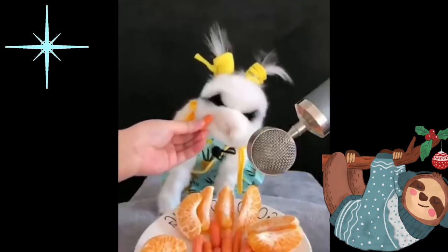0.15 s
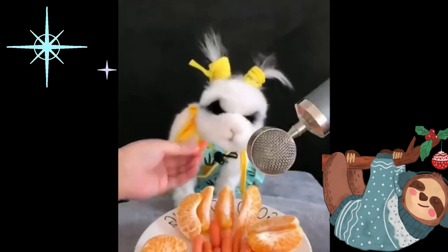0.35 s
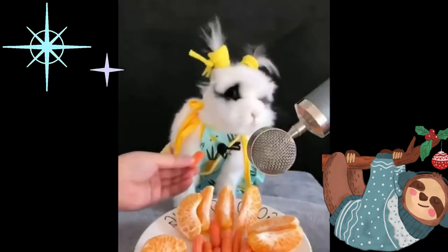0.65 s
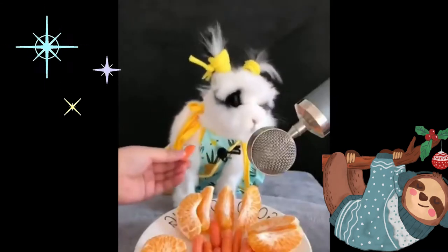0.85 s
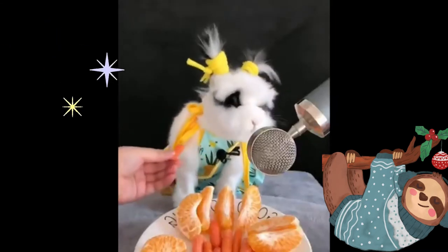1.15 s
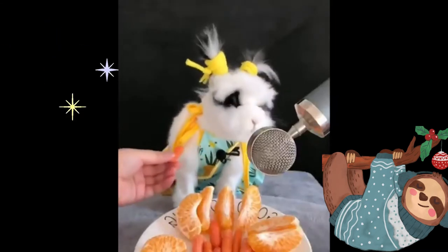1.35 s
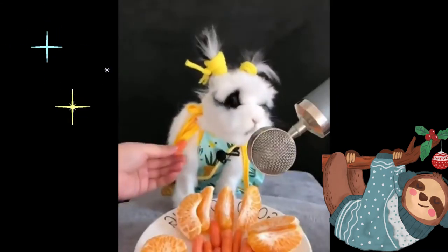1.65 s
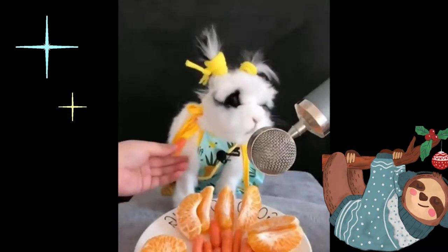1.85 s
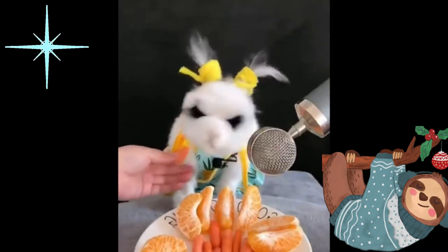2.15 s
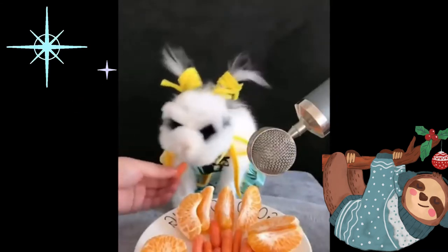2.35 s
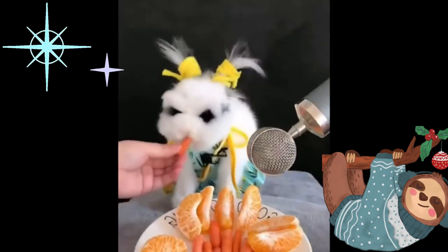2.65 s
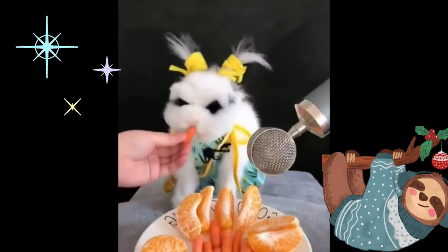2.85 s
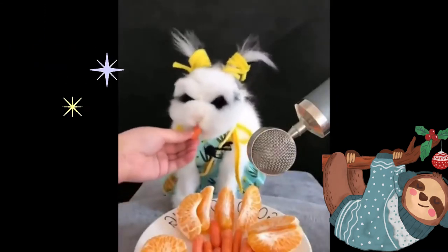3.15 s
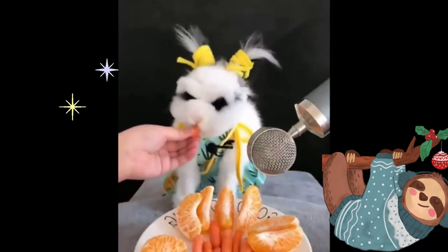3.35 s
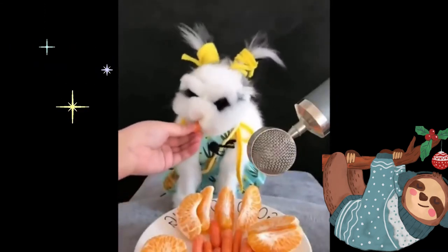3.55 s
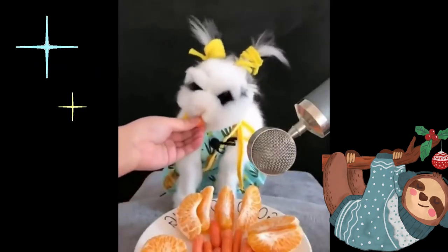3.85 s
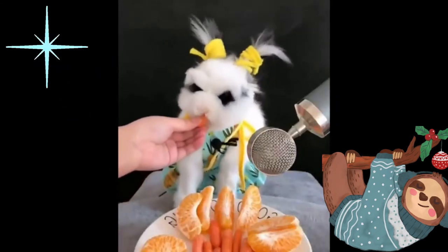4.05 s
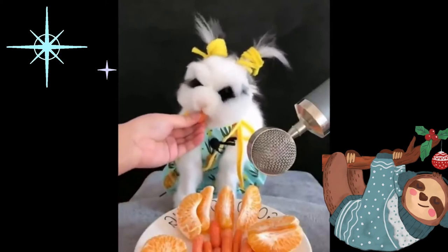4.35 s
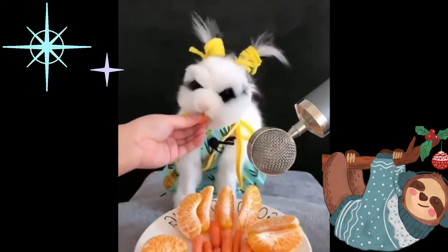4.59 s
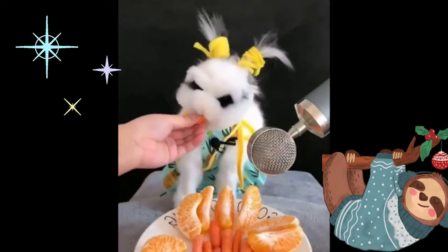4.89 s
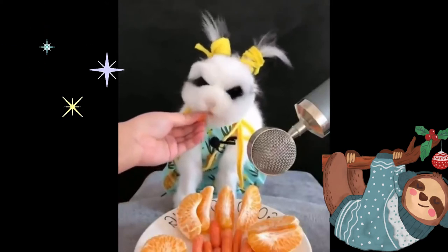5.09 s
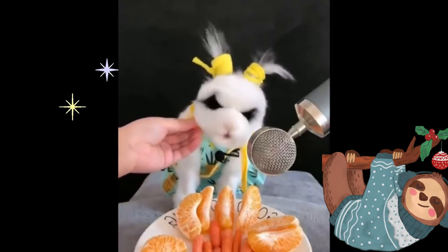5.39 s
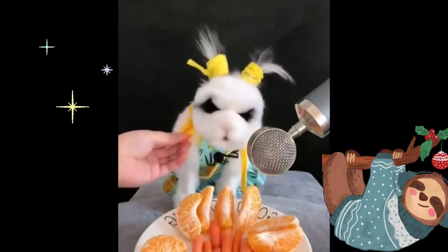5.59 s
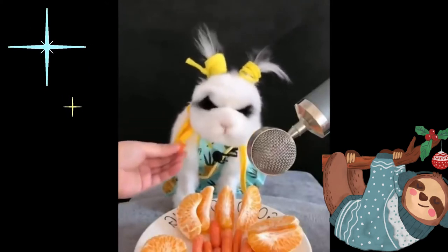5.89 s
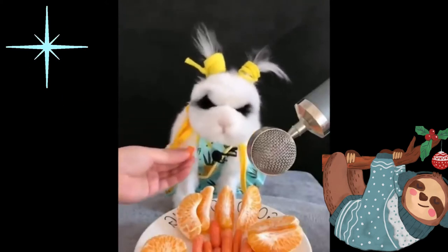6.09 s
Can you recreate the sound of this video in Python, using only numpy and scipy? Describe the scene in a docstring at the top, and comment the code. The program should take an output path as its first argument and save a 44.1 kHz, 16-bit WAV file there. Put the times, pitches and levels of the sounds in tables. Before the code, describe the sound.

Quick, muffled crunches come steadily as a rabbit grinds carrot in its closed mouth, with little wet clicks between strokes. Then its front teeth work on a new piece, giving uneven, crisper gnawing, soft lip smacks and four sharp snaps as it bites clean through. The sound is dry and very close to the microphone, over the low rumble and slight hiss of a quiet room.

```python
"""Hollow, rhythmic crunching, four to five strokes a second: a rabbit grinds carrot with its mouth shut,
right beside a microphone. It then gnaws a fresh piece with its front teeth and four times bites clean
through. Each stroke bursts a swarm of tiny cells, heard through the jawbone, the mouth and the open air,
and stiff fibres fracture in single sharp snaps. Between strokes the jaw swings back and the lips tick
wetly. The low rumble and faint hiss of a quiet room lie beneath."""
import sys
import numpy as np
from scipy import signal
from scipy.fft import rfft, irfft, next_fast_len
from scipy.io import wavfile
from scipy.ndimage import uniform_filter1d, map_coordinates

SR = 44100
rng = np.random.default_rng(int(sys.argv[2]) if len(sys.argv) > 2 else 0)


def digitize_waveform(pressure):
    """Quantize a signal to 16-bit integers and store it at the path in sys.argv[1].

    Rows of a 2-D input are taken as channels; values are limited to [-1, 1].
    """
    field = np.atleast_2d(pressure).T
    bounded = np.clip(field, -1, 1)
    quanta = np.round(bounded * 32767).astype(np.int16)
    wavfile.write(sys.argv[1], SR, quanta)


N = 274743

# Jaw strokes. Each row: peak time in seconds, length in seconds, relative level in dB, crispness in dB.
CHEW_STROKES = [(0.039, 0.067, -47.5, -4), (0.22, 0.071, -44.5, -3), (0.387, 0.049, -43, -6.5),
                (.595, .07, -49, -3.5), (0.798, 0.1, -50, -3.5), (0.999, 0.073, -46.5, -4.5),
                (1.251, .07, -44.5, -0.5), (1.44, 0.06, -47, -2), (1.641, 0.065, -48.5, -4),
                (1.839, 0.062, -47.5, -4), (2.062, .075, -49, -1), (2.3, .078, -45, -4),
                (2.548, .062, -44, -4.5), (2.747, 0.081, -52.5, -2), (2.927, .058, -46, -3.5),
                (3.14, 0.07, -50, -3)]  # grinding, mouth shut
BITE_STROKES = [(3.346, 0.061, -40, -2.5), (3.447, 0.039, -54, -7), (4.024, 0.04, -44.5, -0.5),
                (4.175, 0.048, -38.5, -5), (4.468, 0.045, -41.5, -2), (4.505, .055, -47, -4.5),
                (4.702, 0.08, -39, -1.5), (5.176, 0.033, -47.5, 7), (5.217, 0.067, -42.5, -2.5),
                (5.348, 0.085, -57, -2), (5.469, 0.099, -51.5, 0), (5.662, 0.032, -47.5, -0.5),
                (5.721, .062, -41, -1.5), (5.893, 0.084, -47, -6), (6.105, .085, -44, -4),
                (6.228, 0.044, -53, -8)]  # gnawing, lips open
CUT_STROKES = [(3.538, 0.043, -41, -2.5), (3.791, 0.057, -37, 2.5), (4.279, 0.055, -40.5, 3),
               (4.927, 0.056, -36, -2)]  # right through the piece
# Spectra of the sound paths and the room. Each row: frequency in Hz, relative level in dB.
JAWBONE_PATH = [(70, -4.5), (160, -2.5), (310, -4.5), (580, -3), (780, -7.5), (1500, -36.5), (5000, -76)]
SHUT_MOUTH_PATH = [(350, -45), (600, -2.5), (850, 5), (1200, -3), (1550, -4), (2100, -9.5), (2900, -13.5),
                   (4500, -52.5)]
OPEN_MOUTH_PATH = [(350, -58.5), (700, -11), (1000, -7), (1270, 0), (1530, 1.5), (1950, -9.5), (2700, -13),
                   (4500, -30.5)]
SHUT_CRISP_PATH = [(1500, -21.5), (3000, 0.5), (4400, -3.5), (5600, -1), (6900, 0), (8200, -7),
                   (10000, -16), (13000, -37.5)]
OPEN_CRISP_PATH = [(1800, -72), (3200, -3.5), (4000, -3), (5000, 1.5), (6400, 6), (7600, 4), (8800, -5),
                   (11000, -20.5), (13000, -65)]
TABLE_PATH = [(15, -12.5), (40, 4), (90, -10), (130, -13.5), (230, -17), (400, -37.5), (2000, -92)]
SPRAY_SPECTRUM = [(1800, -36), (3000, -15), (5000, -7), (9800, 0.5), (11300, -4.5), (12700, 3)]
RUMBLE_SPECTRUM = [(4, 3.5), (14, 2), (30, -5), (50, -12), (75, -19), (105, -27.5), (300, -43.5),
                   (700, -60.5)]
HISS_SPECTRUM = [(100, -36), (250, 2), (500, -3), (800, -0.5), (1300, 3.5), (2200, -4.5), (4000, -8),
                 (5600, -3), (7500, -3.5), (10000, -17), (13000, -54)]
# Stiff fibres breaking. Each row: start in seconds, knock level in dB, crack level in dB.
FIBRE_SNAPS = [(0.1426, -32.5, -52), (.149, -32.5, -38), (.2137, -29, -29.5), (.5693, -40.5, -49),
               (.6095, -66, -40), (.987, -34, -60), (1.213, -37.5, -41.5), (1.2373, -57, -42),
               (1.4398, -38.5, -37.5), (1.452, -42, -44), (1.842, -39, -37.5), (2.0076, -44.5, -48),
               (2.165, -47, -46.5), (2.2897, -36.5, -44), (2.5389, -34.5, -50), (2.5473, -51, -37.5),
               (2.716, -38.5, -42), (2.7421, -38.5, -41.5), (2.9188, -39.5, -42.5), (3.1329, -45.5, -42),
               (3.2901, -40, -47), (3.3036, -37.5, -43.5), (3.3193, -54, -39), (3.3521, -39, -34),
               (3.381, -38, -30), (3.4651, -41.5, -43), (3.4713, -43.5, -44), (3.5157, -34, -40),
               (3.5258, -40, -41), (3.538, -28.5, -28.5), (3.5601, -25.5, -18), (3.5718, -25, -10),
               (3.6267, -40.5, -34.5), (3.749, -35.5, -34), (3.7862, -46, -19.5), (3.8009, -27.5, -19.5),
               (3.8705, -43.5, -44.5), (3.9901, -32.5, -30.5), (4.2444, -50, -32), (4.2487, -30.5, -21),
               (4.261, -22.5, -20.5), (4.2673, -50, -13.5), (4.2896, -26.5, -17), (4.362, -42, -40),
               (4.692, -44, -37), (4.706, -28, -27), (4.8498, -41.5, -47), (4.916, -28, -28),
               (4.9293, -18.5, -18), (4.9335, -21.5, -16), (4.9372, -20, -16), (4.9795, -35, -37.5),
               (5.6205, -32.5, -36), (5.7035, -26.5, -25.5), (5.7305, -37, -45), (5.8823, -32, -35),
               (6.0252, -35.5, -44.5), (6.063, -38.5, -42), (6.0897, -37, -38.5), (6.199, -40, -37)]
# Head resonances. Each row: frequency in Hz, time to decay 60 dB in seconds, relative level in dB.
HEAD_MODES = [(300, 0.026, -60.5), (800, 0.0078, -8), (1352, 0.011, 8), (1950, 0.0014, 20.5)]
# The jaw meeting a lump. Each row: peak time in seconds, relative level in dB.
JAW_BUMPS = [(0.146, -37.5), (2.198, -50), (2.64, -51), (2.86, -46.5), (3.023, -50.5), (3.236, -45),
             (3.524, -36), (3.779, -34), (3.99, -37), (4.466, -42), (4.683, -42), (4.851, -44.5),
             (4.915, -35.5), (5.658, -51), (5.882, -44.5)]
# Wet ticks of the parting lips. Each row: start in seconds, level in dB, pitch in Hz.
LIP_TICKS = [(0.432, -40, 9200), (0.4955, -45.5, 6500), (0.7127, -40.5, 9100), (.9373, -45, 8700),
             (1.3745, -43.5, 8700), (1.557, -46.5, 8100), (2.663, -52, 8100), (4.7885, -34.5, 7350),
             (4.856, -37.5, 8150), (5.1253, -37, 6400)]
# Soft smacks of lips and tongue. Each row: peak time in seconds, relative level in dB.
LIP_SMACKS = [(.44, -55), (1.969, -60), (2.12, -56), (3.253, -56), (3.574, -40.5), (3.669, -52.5),
              (3.932, -53.5), (4.118, -52.5), (4.41, -55.5), (4.627, -50.5), (4.807, -48.5), (4.99, -50),
              (5.135, -53.5), (5.545, -61), (5.608, -48.5), (5.822, -58.5), (6.03, -57)]
# A thin whistle and a tiny squeak.
# Each row: peak time in seconds, half length in seconds, frequency in Hz, bandwidth in Hz, level in dB.
SQUEAK_BANDS = [(2.41, 0.12, 5450, 300, -66), (5.974, 0.0064, 3820, 400, -51)]


def amp(db):
    """Decibels to gain."""
    return 10 ** (np.asarray(db) / 20)


def unit(x):
    """Scale to rms 1."""
    return x / np.sqrt(np.mean(x ** 2) + 1e-20)


def add(track, s, sound):
    """Mix a sound into a track from time s."""
    start = int(np.clip(round(s * SR), 0, N - 1))
    track[start:start + len(sound)] += sound[:N - start]


def coloured(x, points):
    """Causal filter with the gain of (Hz, dB) points; white noise keeps its power."""
    m = 2 * next_fast_len(N // 2 + SR // 4)
    hz, db = np.transpose(points)
    gain = unit(amp(np.interp(np.log(np.fft.rfftfreq(m, 1 / SR) + 1), np.log(hz), db)))
    cepstrum = irfft(np.log(gain), m)
    cepstrum[1:m // 2] *= 2
    cepstrum[m // 2 + 1:] = 0
    return irfft(rfft(x, m) * np.exp(rfft(cepstrum)), m)[:N]


def together(*amplitudes):
    """Incoherent sounds add in power."""
    return np.sqrt(sum(a ** 2 for a in amplitudes))


def effort(strokes, rise, shape):
    """Envelope of strokes summed in power; each builds up for the share rise of its -10 dB length."""
    t = np.arange(0, N, 32) / SR
    power = 0
    for s, length, db in strokes:
        flank = np.where(t < s, rise, 1 - rise) * length
        power += amp(db) ** 2 * 10 ** -(np.abs((t - s) / flank) ** shape)
    return np.interp(np.arange(N), np.linspace(0, N, len(power)), np.sqrt(power))


def crushing(strokes, rise, shape):
    """One force drives two envelopes: the hollow part of the strokes and their crisp part."""
    hollow = [(s, length, db) for s, length, db, _ in strokes]
    crisp = [(s, length, db + crisp_db) for s, length, db, crisp_db in strokes]
    return effort(hollow, rise, shape), effort(crisp, rise, shape)


def cells(per_second, spread_db):
    """Cells burst as a Poisson process, most small and a few large."""
    bursting = rng.random(N) < per_second / SR
    return bursting * amp(spread_db * np.clip(rng.standard_normal(N), -2.5, 2.5))


def crackle(bursts, rub_db, tear_s=0.00012):
    """Each rupture is an impulse with a brief tearing tail, over the friction noise of wet pulp."""
    impulses = bursts * rng.standard_normal(N)
    tails = signal.lfilter([1], [1, -np.exp(-1 / (tear_s * SR))], bursts)
    tearing = tails * rng.standard_normal(N)
    x = unit(impulses) + unit(tearing) + amp(rub_db) * rng.standard_normal(N)
    # the tooth advances steadily, so the energy set free evens out over a few hundredths of a second
    return x / np.sqrt(np.abs(uniform_filter1d(x ** 2, size=900)) + 1e-9)


def cavity(x, depth_db, width_hz, glide_s):
    """Cavity resonance: the moving mouth lifts some bands and sinks others."""
    hz, t, spectra = signal.stft(x, SR, nperseg=256)
    field = rng.standard_normal(spectra.shape)
    for axis, span in enumerate([width_hz / hz[1], glide_s / t[1]]):
        hill = np.exp(-(np.arange(-40, 41) / span * 2) ** 2)
        field = signal.fftconvolve(field, np.expand_dims(hill, 1 - axis), "same")
    gain = amp(depth_db * np.clip(unit(field), -2, 2))
    gain /= np.sqrt(uniform_filter1d(gain ** 2, size=21, axis=0))  # resonances add no energy
    return signal.istft(spectra * gain, SR, nperseg=256)[1][:N]


def grinding(return_phase=0.51, return_s=0.098, return_db=-56):
    """Source and filter: molars mill the pulp, and closed cheeks give it a low, hollow colour."""
    chew, chew_crisp = crushing(CHEW_STROKES, rise=0.41, shape=1.85)
    peaks = np.array(CHEW_STROKES)[:, 0]
    returns = peaks[:-1] + return_phase * np.diff(peaks)  # the jaw swings back between chews
    swing = effort([(s, return_s, return_db) for s in returns], rise=0.21, shape=0.6)
    bump = bumping()
    jaw = together(amp(-4.5) * chew, swing, bump)
    mouth = together(chew, amp(-10) * swing, amp(-5) * bump)
    crisp = together(chew_crisp, amp(-10) * swing)
    bursts = cells(per_second=650, spread_db=6.5)
    body = amp(-2.0) * coloured(jaw * crackle(bursts, rub_db=3.5), JAWBONE_PATH)
    hollow = amp(-0.44) * coloured(mouth * crackle(bursts, rub_db=2.5), SHUT_MOUTH_PATH)
    crunch = amp(0.38) * coloured(crisp * crackle(bursts, rub_db=3), SHUT_CRISP_PATH)
    return cavity(body + hollow + crunch, depth_db=3.5, width_hz=270, glide_s=0.009)


def background(flutter_db=3.0, lumps_per_second=14):
    """Ambient noise: a low rumble, amplitude-modulated into soft lumps, and the room's steady hiss."""
    knots = rng.standard_normal(int(N * lumps_per_second / SR) + 4)
    wander = map_coordinates(knots, [np.arange(N) * lumps_per_second / SR])
    lumps = amp(flutter_db * np.clip(wander, -2, 2))
    rumble = unit(lumps * coloured(rng.standard_normal(N), RUMBLE_SPECTRUM))
    hiss = unit(coloured(rng.standard_normal(N), HISS_SPECTRUM))
    return amp(-34.5) * rumble + amp(-67.5) * hiss


def table_tugs(lead_s=0.019, stretch=1.33):
    """Structure-borne sound: each stroke shakes the table under the microphone just before its crunch."""
    pulls = []
    for strokes, gain_db in [(CHEW_STROKES, -8.5), (BITE_STROKES, 0.5), (CUT_STROKES, 1)]:
        tugs = [(s - lead_s, stretch * length, db + gain_db) for s, length, db, _ in strokes]
        pulls.append(effort(tugs, rise=0.56, shape=0.83))
    shake = together(*pulls, amp(5.5) * bumping())
    return coloured(shake * rng.standard_normal(N), TABLE_PATH)


def fractures(faint_per_stroke=3, soft_hz=6090, soft_db=-40, hz_per_db=27):
    """Brittle fracture, harder cracks sounding higher. Each row: start in s, knock dB, crack dB, Hz."""
    faint = []
    for s, length, db, crisp_db in CHEW_STROKES + BITE_STROKES:
        offsets = 0.35 * length * rng.uniform(-1, 1, faint_per_stroke)
        knocks_db = db - 1 - 1.5 * rng.uniform(-0.7, 1, faint_per_stroke)
        faint += zip(s + offsets, knocks_db, knocks_db + crisp_db)
    return [(s, knock_db, crack_db, soft_hz + hz_per_db * max(crack_db - soft_db, 0))
            for s, knock_db, crack_db in FIBRE_SNAPS + faint]


def ring(t, hz, t60):
    """A struck resonance decays exponentially, by 60 dB in t60 seconds."""
    return np.sin(2 * np.pi * hz * t) * 1000 ** (-t / t60)


def snaps(events, splinter_t60=0.027, pitch_scatter=0.017, span_s=0.0015):
    """Impulse excitation: each snap rings at its own pitch, splinters and strikes the head's modes."""
    t = np.arange(SR // 30) / SR
    crack_t60, fibre_t60 = 0.0024 / 4, 0.0024 / 6
    sized = lambda x: x * np.sqrt(span_s * SR / np.sum(x ** 2))  # the energy of rms 1 held for span_s
    out = np.zeros(N)
    for s, knock_db, crack_db, pitch_hz in events:
        hz = pitch_hz * (1 + pitch_scatter * np.clip(rng.standard_normal(), -2, 2))
        knock = sum(amp(db + rng.normal(0, 3)) * ring(t, mode_hz * np.exp(rng.normal(0, .1)), t60)
                    for mode_hz, t60, db in HEAD_MODES)
        tearing = rng.standard_normal(len(t)) * amp(-60 * t / splinter_t60)
        splinters = np.convolve(tearing, ring(t, hz, fibre_t60))[:len(t)]
        crack = sized(ring(t, hz, crack_t60)) + amp(-1) * sized(splinters)
        # so small a fibre radiates no bass; lips and fur soak up what lies well above its pitch
        band = signal.butter(2, [0.62 * hz, min(1.306 * hz, SR / 3)], "bandpass", fs=SR)
        crack = signal.lfilter(*band, crack)
        add(out, s, amp(knock_db) * sized(knock) + amp(crack_db) * sized(crack))
    return out


def bumping(length_s=0.026):
    """Envelope of the short, dull impacts of the jaw on a lump."""
    return effort([(s, length_s, db) for s, db in JAW_BUMPS], rise=0.39, shape=1.42)


def lip_ticks(knock_db=-13):
    """Parting lips make wet transients that hardly excite the head; rows as in fractures()."""
    return [(s, db + knock_db, db, hz) for s, db, hz in LIP_TICKS]


def gnawing(smack_s=0.041):
    """Lips smack and incisors break the carrot by shear; only a full cut throws off a bright spray."""
    bite, bite_crisp = crushing(BITE_STROKES, rise=0.38, shape=2.16)  # sinks in quickly
    cut, cut_crisp = crushing(CUT_STROKES, rise=0.6, shape=2.43)  # strains until the piece gives
    lips = effort([(s, smack_s, db) for s, db in LIP_SMACKS], rise=0.49, shape=0.67)
    jaw = together(amp(-14.5) * bite, amp(-7) * cut, amp(-5.5) * lips)
    mouth = together(bite, cut, amp(-3.5) * lips)
    crisp = together(bite_crisp, cut_crisp, lips)
    bursts = cells(per_second=1300, spread_db=6.5)
    body = amp(2.0) * coloured(jaw * crackle(bursts, rub_db=-5.5), JAWBONE_PATH)
    hollow = amp(-0.3) * coloured(mouth * crackle(bursts, rub_db=8), OPEN_MOUTH_PATH)
    crunch = amp(2.13) * coloured(crisp * crackle(bursts, rub_db=2), OPEN_CRISP_PATH)
    spray = amp(1.5) * coloured(cut_crisp * crackle(bursts, rub_db=9), SPRAY_SPECTRUM)
    return cavity(body + hollow + crunch + spray, depth_db=7.0, width_hz=1800, glide_s=0.056)


def squeaks():
    """Narrow-band noise is heard as a pitch; each squeak swells and fades."""
    out = np.zeros(N)
    for s, half_s, hz, width_hz, db in SQUEAK_BANDS:
        t = np.arange(-3 * half_s, 3 * half_s, 1 / SR)
        band = signal.butter(2, [hz - width_hz / 2, hz + width_hz / 2], "bandpass", fs=SR)
        whistle = unit(signal.lfilter(*band, rng.standard_normal(len(t))))
        add(out, s + t[0], amp(db) * whistle * np.exp(-(t / half_s) ** 2))
    return out


def gain_control(x, threshold_db=-34, memory_s=0.051):
    """Compression: a loud crunch turns the gain down, and it creeps back soon after."""
    above_bass = signal.lfilter(*signal.butter(2, 200, "highpass", fs=SR), x)
    keep = np.exp(-1 / (memory_s * SR))
    power = signal.lfilter([1 - keep], [1, -keep], above_bass ** 2)
    return x / np.sqrt(1 + power / amp(threshold_db) ** 2)


def scene():
    """Direct sound of the eating, close and dry, superposed on the table's tugs and the room's noise."""
    eating = grinding() + amp(2.0) * gnawing() + snaps(fractures() + lip_ticks()) + squeaks()
    return (eating + table_tugs() + background())[None]


def record(dry):
    """Automatic gain control, then a steep low-pass filter that limits the bandwidth."""
    top_hz = 13100
    m = next_fast_len(N + SR // 4)
    hz = np.fft.rfftfreq(m, 1 / SR)
    spectrum = rfft(gain_control(dry), m)
    return irfft(spectrum / np.sqrt(1 + (hz / top_hz) ** 90), m)[:, :N]


dry = scene()
out = record(dry)
digitize_waveform(out)
```